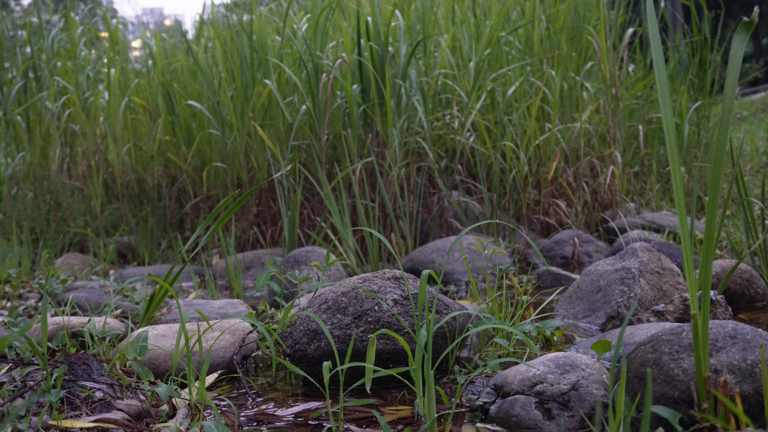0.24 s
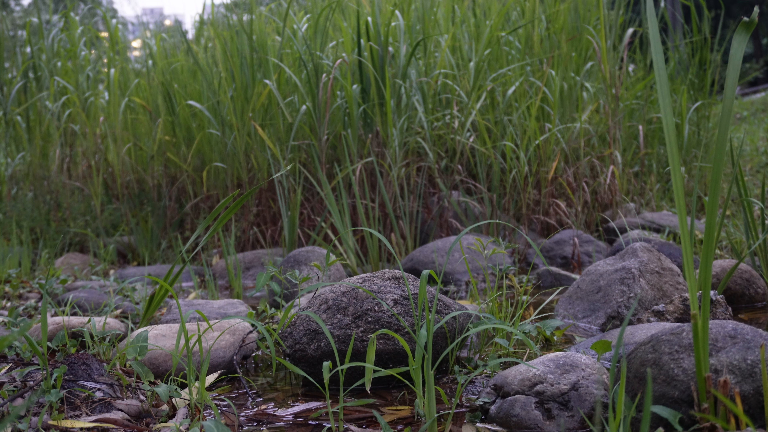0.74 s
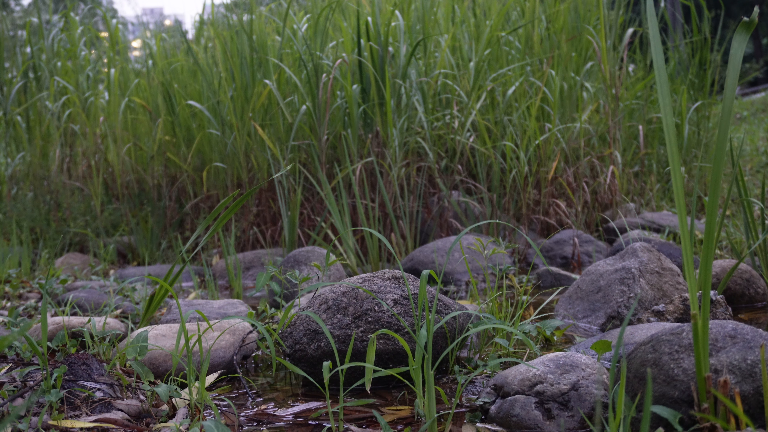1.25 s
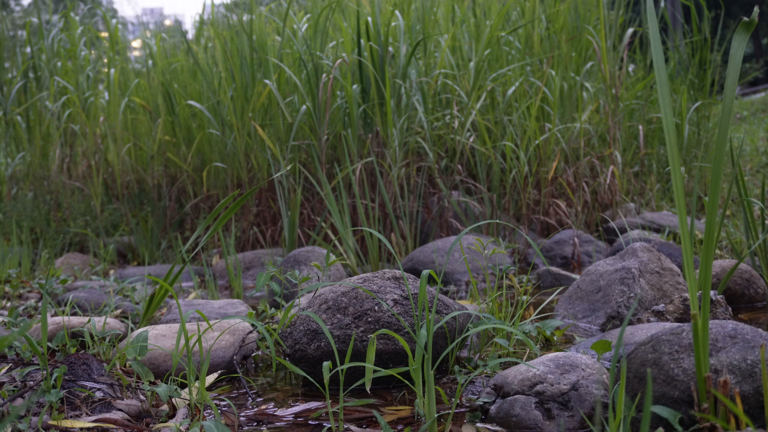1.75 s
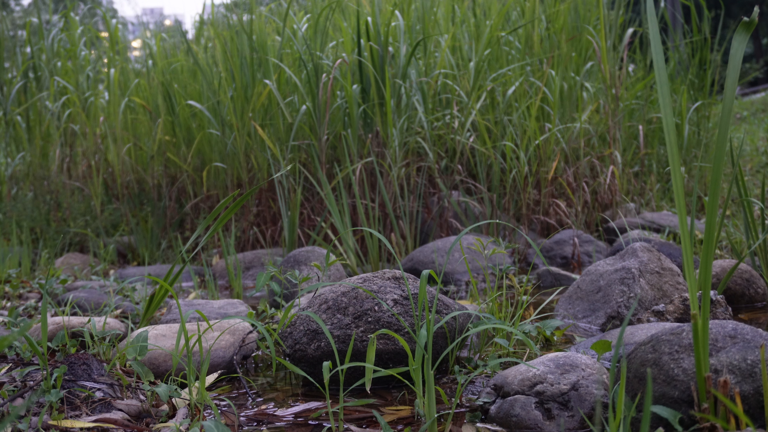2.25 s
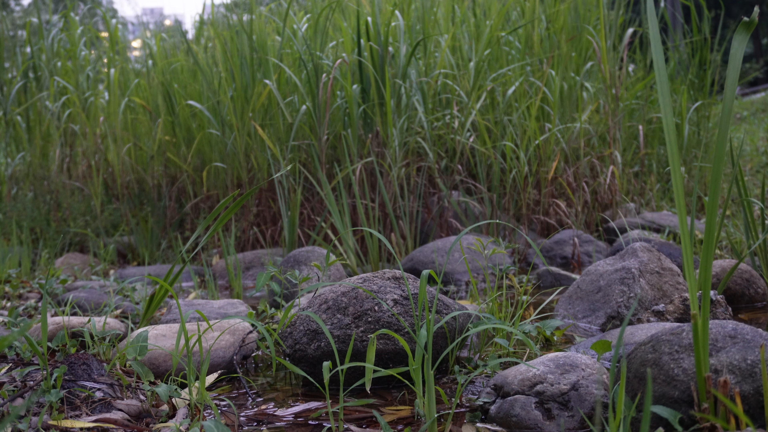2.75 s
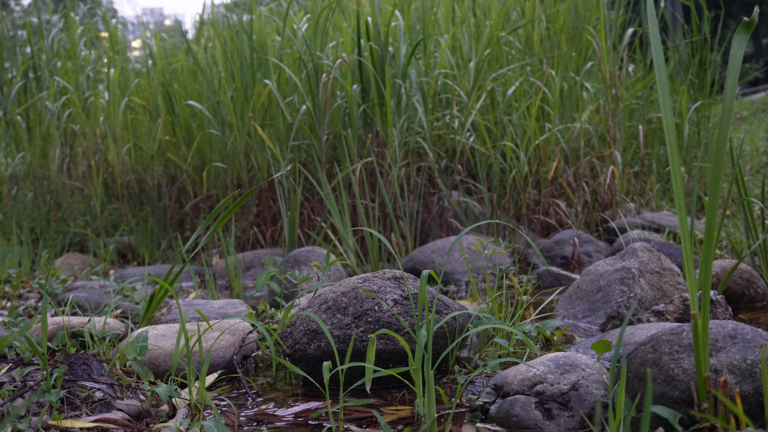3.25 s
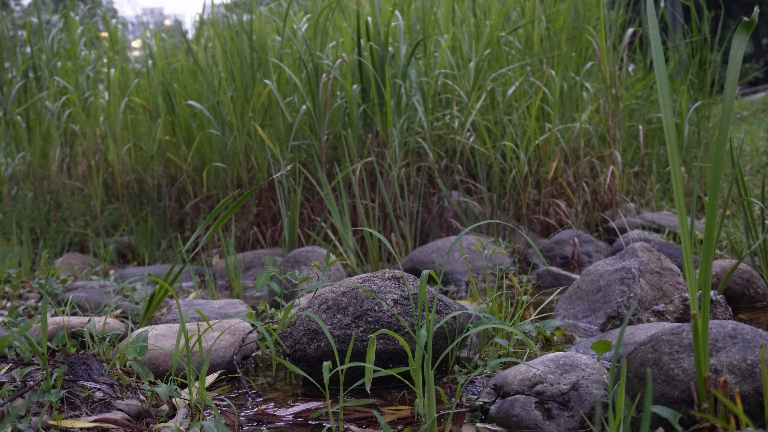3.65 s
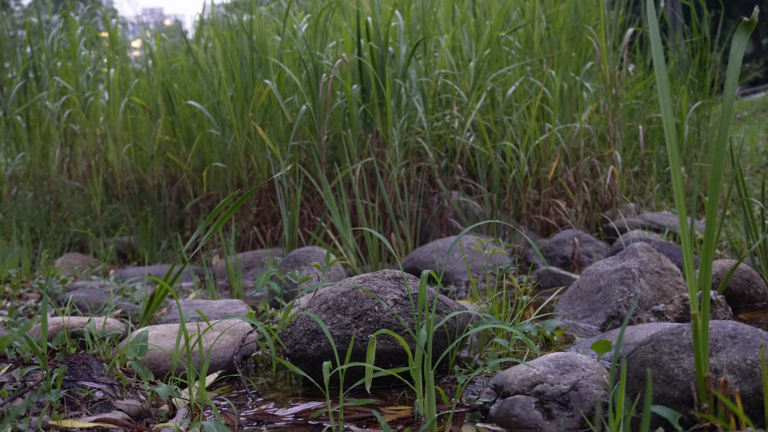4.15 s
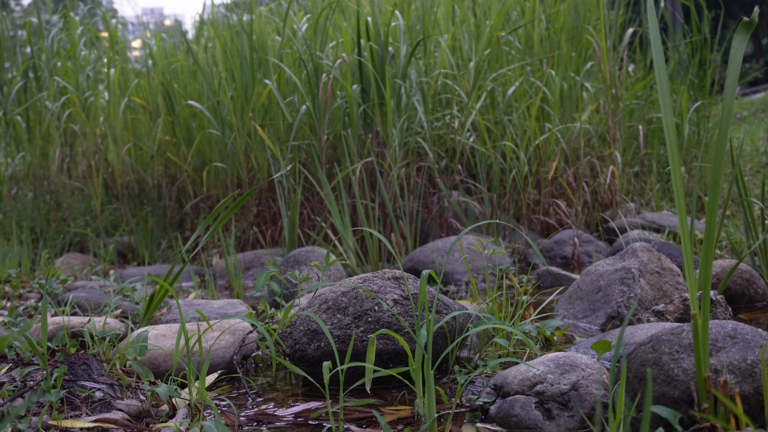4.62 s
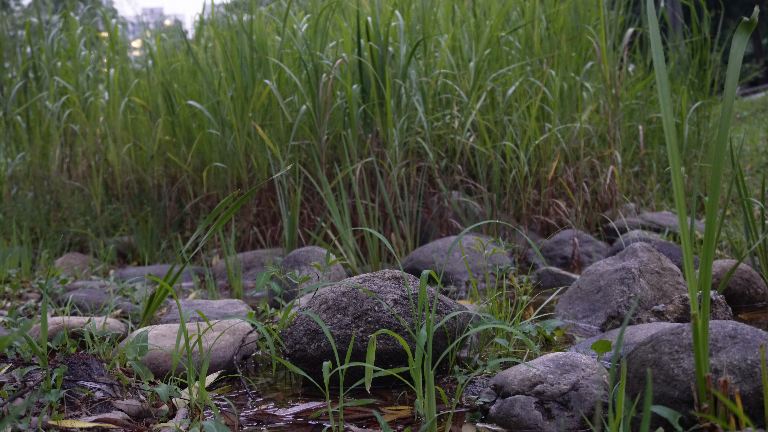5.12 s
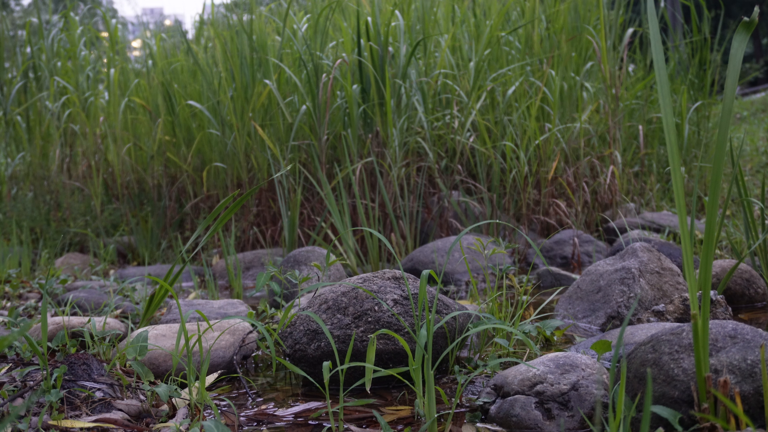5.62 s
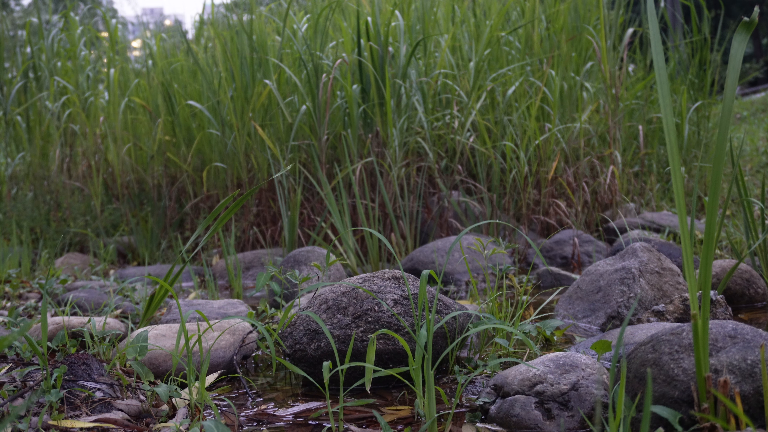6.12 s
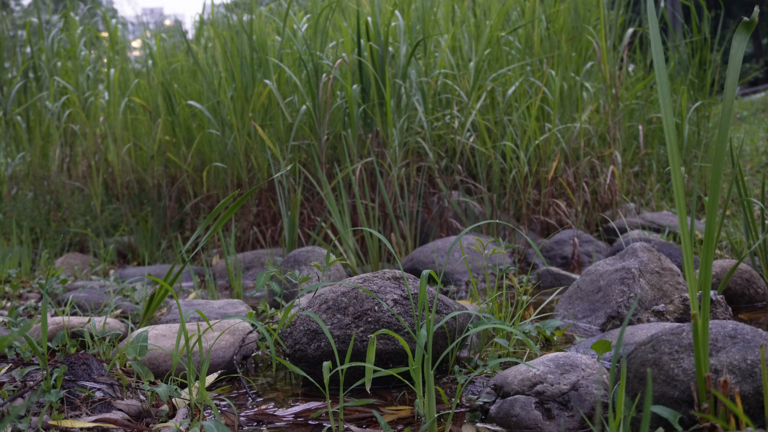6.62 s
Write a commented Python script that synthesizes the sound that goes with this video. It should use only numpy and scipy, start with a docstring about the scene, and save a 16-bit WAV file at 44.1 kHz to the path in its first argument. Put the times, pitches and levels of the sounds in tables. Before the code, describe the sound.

A thick, bright wall of far cicadas shrills continuously in trees around a stony, reedy park stream. Three nearer cicadas buzz through it with rapid, grainy rattles. Another sings about once a second: thin hiss, fluttering whine that swells and steadies, then a lower rasp cut short. Faint town rumble, a distant motor drone and a very soft wash of water lie beneath. Outdoor stereo, closely spaced microphones, steady position.

```python
"""A dense, glassy shrill of far cicadas fills the trees round a reedy park stream, flickering by band.
Three near cicadas buzz through it: volleys of rib snaps, each at its own beat, ring their bodies.
One more sings a phrase about every second: thin hiss, fluttering whine, then a low rasp that breaks off.
Its snaps drive resonances that follow the pitch of the abdomen. Filtered noise makes the far town
rumble, the drone of a motor and the soft wash of the stream."""
import sys
import numpy as np
from scipy import signal
from scipy.fft import rfft, irfft
from scipy.io import wavfile
from scipy.ndimage import uniform_filter1d

SR = 44100
rng = np.random.default_rng(int(sys.argv[2]) if len(sys.argv) > 2 else 0)


def transcribe(u):
    """Save the signal u as a 16-bit wav file named by the first command-line argument.

    u: samples, shape (n,) or (channels, n), limited to [-1, 1]; the rate is SR.
    q: integer samples, one column per channel.
    """
    v = np.clip(np.atleast_2d(u).T, -1, 1)
    q = np.round(v * 32767).astype(np.int16)
    wavfile.write(sys.argv[1], SR, q)


N = 302967
TIME = np.arange(N) / SR  # s
FREQ = np.maximum(np.fft.rfftfreq(N, 1 / SR), 1)  # Hz, kept above 0 for logs and division

# town rumble and stream wash, spectrum before trims: freq_hz, level_db (per Hz)
GROUND_SPECTRUM = [(20, -95), (42, -58.5), (70, -64.5), (140, -62), (260, -66), (400, -71.5), (600, -75),
                   (1150, -82), (1900, -83.5), (4000, -102.5)]
# far traffic, deep rumble; only the changes about the mean count: time_s, level_db
RUMBLE_LEVEL = [(0.05, -47), (0.07, -42), (0.37, -52), (2.36, -47), (2.79, -51), (5.9, -50), (6.71, -48),
                (6.8, -42)]
# far traffic, drone; only the changes about the mean count: time_s, level_db
DRONE_LEVEL = [(0.05, -36), (0.2, -37), (2.46, -40), (3.02, -38), (3.28, -40), (6.38, -40.5), (6.8, -40)]
# far motor, its pitch sinking overall while its level comes and goes: time_s, pitch_hz, level_db
MOTOR_COURSE = [(0, 220, -39.5), (1.2, 218, -47.5), (2, 186, -40), (3, 197, -52.5), (6.87, 187, -46)]
# far chorus, spectrum before trims: freq_hz, level_db (per Hz)
CHORUS_SPECTRUM = [(2400, -78.5), (2750, -68), (3150, -65.5), (3550, -58), (3950, -57.5), (4300, -50),
                   (4800, -55.5), (5250, -57), (5850, -50.5), (6200, -60), (7200, -56.5), (8500, -63.5),
                   (10200, -66.5), (12500, -74.5), (15300, -94)]
# far singers that stand out, before they waver and ease off:
# pitch_hz, half_width_hz, peak_db (per Hz), left_minus_right_db
FAR_SINGERS = [(4893, 11, -59, -6), (4940, 4.1, -43, -1), (5214, 16, -47.5, 3), (6010, 16, -51.5, 1),
               (6394, 21, -47.5, -4), (7060, 22, -65, 1), (7150, 50, -67, 1), (7766, 15, -67, -6)]
# body resonances of the three near buzzers, relative levels: freq_hz, half_width_hz, level_db
LOW_BUZZER_BODY = [(3685, 222, -0.5), (4890, 420, 3), (6470, 400, -2.5), (8300, 450, -7.5)]
BRIGHT_BUZZER_BODY = [(4380, 160, -6.5), (5676, 210, 4.5), (8140, 340, -17.5), (9520, 370, -9.5),
                      (10850, 270, -15.5)]
DOUBLE_BUZZER_BODY = [(3860, 92, -2), (6065, 530, 1), (9700, 670, -10.5)]
# abdomen partials of the whine, relative levels: pitch_multiple, width_hz, level_db
WHINE_PARTIALS = [(2, 260, 3.5), (5, 310, 8)]
# partials of the slack abdomen in the rasp, relative levels: pitch_multiple, width_hz, level_db
RASP_PARTIALS = [(1.58, 280, -24), (1.89, 149, -8.5), (2, 113, -3.5), (2.11, 158, -7), (2.52, 323, 1)]
# phrases, each lasting until the next; hiss peak before the hiss trim: start_s, hiss_peak_db
PHRASE_STARTS = [(-.52, -34), (.487, -32), (1.5, -33), (2.507, -33), (3.547, -33), (4.522, -34),
                 (5.509, -34), (6.498, -35)]

LAST_PHRASE_S = 1.0
# abdomen pitch: it tightens early in a phrase and slackens shortly before the end
TAUT_HZ, SLACK_HZ = 1464.5, 1394
TIGHTEN_S, SLACKEN_LEAD_S, SLACKEN_S = 0.22, 0.228, 0.16
# the whine sets in after a pause, swells, and gives way as the abdomen slackens
WHINE_START_DB, WHINE_DELAY_S, WHINE_ATTACK_S, SWELL_DB_PER_S, WHINE_SLACK_DB = -45, 0.14, 0.09, 6.5, -8
# the pumping of the abdomen holds, then dies away as the whine settles
FLUTTER_HZ, FLUTTER_HOLD_S, FLUTTER_FADE_S = 24.7, 0.2417, 0.35
# the rasp creeps in under the whine and jumps up with the slack
RASP_TAUT_DB, RASP_DELAY_S, RASP_ATTACK_S, RASP_SLACK_DB = -44, 0.43, 0.36, 14.5
BREAK_S = 0.034  # whine and rasp break off over this time
SCATTER, LIMP = 0.6, 0.2  # noise between snaps, inequality of the tymbals (shares of a snap)
HISS_DELAY_S = 0.078  # from the start of a phrase to the peak of its hiss
TOP_HZ = 15500


def undb(db):
    """Decibels to gain."""
    return 10 ** (np.asarray(db) / 20)


def unit(x):
    """Scale each channel to rms 1."""
    return x / np.sqrt(np.mean(x ** 2, axis=-1, keepdims=True))


def pan(db):
    """Left and right gains for a left-minus-right level difference."""
    return undb(np.array([[db], [-db]]) / 2)


def ease(x):
    """A smooth step from 0 to 1 as x goes from 0 to 1."""
    return np.sin(np.pi / 2 * np.clip(x, 0, 1)) ** 2


def follow(table, at):
    """The columns of a table after the first, joined by straight lines."""
    x, *columns = np.transpose(table)
    return [np.interp(at, x, column) for column in columns]


def walk(rate):
    """Random levels held 1 / rate s and smoothed twice; spread near 1."""
    hold = int(SR / rate)
    steps = np.repeat(rng.standard_normal(N // hold + 1), hold)
    return 1.3 * uniform_filter1d(uniform_filter1d(steps, hold), hold)[:N]


def shape(x, response):
    """Filter by a frequency response."""
    return irfft(rfft(x) * response, N)


def colour(points):
    """Response through (Hz, dB) points, straight on a log frequency axis."""
    hz, db = np.transpose(points)
    return undb(np.interp(np.log(FREQ), np.log(hz), db))


def resonance(hz, width):
    """A steep resonance, gain 1 at its centre; width in Hz between its half-amplitude points."""
    return (1 + 1j * (FREQ ** 2 - hz ** 2) / (FREQ * width)) ** -2


def glide(drive, pitch, partials):
    """Resonances that follow a pitch: turn the drive down to 0 Hz, smooth it, turn it back."""
    out = 0
    for multiple, width, db in partials:
        turn = np.exp(2j * np.pi * np.cumsum(multiple * pitch) / SR)
        lowpass = signal.butter(3, width / 2, fs=SR, output="sos")
        ring = signal.sosfilt(lowpass, drive / turn)
        out = out + undb(db) * unit((ring * turn).real)
    return out


def air_noise(likeness, response=1):
    """Stereo noise, 0 dB per Hz times a response, with the given correlation of left and right."""
    re, im = rng.standard_normal((2, 2, len(FREQ)))
    mid, side = (re + 1j * im) * np.sqrt(SR * N / 2) / 2
    c = np.clip(likeness, -1, 1)
    spectrum = mid * np.sqrt(1 + c) + side * np.sqrt(1 - c) * np.array([[1], [-1]])
    return irfft(spectrum * response, N)


def clicks(times, sizes):
    """Impulses, each shared between two neighbouring samples to land between them."""
    at = np.ravel(times) * SR
    keep = (at >= 0) & (at < N - 1)
    at, sizes = at[keep], np.ravel(sizes)[keep]
    i = at.astype(int)
    return np.bincount(i, sizes * (1 - at + i), N) + np.bincount(i + 1, sizes * (at - i), N)


def beats(hz, drift):
    """Times of the strokes of a muscle whose rate wanders a little."""
    phase = np.cumsum(hz * (1 + drift * walk(2))) / SR + rng.random()
    return np.interp(np.arange(1, phase[-1]), phase, TIME)


def foliage(x, scatter_s, wet_db, t60=1.0):
    """Reeds smear the sound differently for each ear; the trees add a short diffuse tail."""
    t = TIME[:SR // 2]
    near, far = rng.standard_normal((2, 2, len(t)))
    near = unit(signal.fftconvolve(x[None], near * np.exp(-t / scatter_s), axes=1)[:, :N])
    far = unit(signal.fftconvolve(x[None], far * undb(-60 * t / t60), axes=1)[:, :N])
    return unit(near + undb(wet_db) * far)


def ripple(depth_db, spacing_hz):
    """Echoes from stones and trunks give each ear its own fine, fixed, uneven response."""
    grid = np.arange(0, SR / 2, spacing_hz)
    rows = rng.standard_normal((2, 2048))
    gains = [undb(depth_db * np.interp(FREQ, grid, row[:len(grid)])) for row in rows]
    return unit(np.array(gains))


def close_pair(x, alike_hz=3500, apart_hz=5700, narrow=0.16):
    """Two microphones close together hear the longer waves almost alike."""
    mid = x.mean(axis=0)
    width = np.interp(FREQ, [alike_hz, apart_hz], [narrow, 1])
    return shape(mid + shape(x - mid, width), 1 / np.hypot(1, width))


def ground(db=-0.5, motor_width=36, singers_db=-80):
    """Far traffic with a droning motor, the even wash of the stream, and the low partial of far singers."""
    levels = follow(RUMBLE_LEVEL, TIME) + follow(DRONE_LEVEL, TIME)
    rumble_db, drone_db = (level - np.mean(level) for level in levels)
    likeness = np.interp(FREQ, [30, 90, 180, 350, 1500], [.999995, .99997, .9987, .979, .974])
    bed = air_noise(likeness, colour(GROUND_SPECTRUM))
    # three crossfaded bands: deep rumble, drone, stream wash
    deep = np.interp(FREQ, [60, 100], [1, 0])
    wash = np.interp(FREQ, [300, 900], [0, 1])
    rumble = shape(bed, deep) * undb(rumble_db)
    drone = shape(bed, 1 - deep - wash) * undb(drone_db)
    motor_hz, motor_db = follow(MOTOR_COURSE, TIME)
    motor = glide(rng.standard_normal(N), motor_hz, [(1, motor_width, 0)]) * undb(motor_db)
    singers = air_noise(1.0, resonance(1484, 216)) * undb(singers_db)
    return undb(db) * (rumble + drone) + motor + shape(bed, wash) + singers


def chorus(db=-1.0, fade_db_per_s=0.18, flicker_db=0.32, shrill_db=0, pan_db=1.3):
    """Far cicadas blur into noise whose bands swell on their own; a few tones stand out; all ease off."""
    likeness = np.interp(FREQ, [2420, 3100, 4500, 7060, 12000], [1.0, 0.45, 0.52, 0.21, -0.27])
    low_edge = 1 / np.sqrt(1 + (2380 / FREQ) ** 24)  # small bodies radiate almost nothing lower
    response = colour(CHORUS_SPECTRUM) * low_edge * ripple(depth_db=1.8, spacing_hz=39.76)
    crowd = rfft(air_noise(likeness, response))
    centres = np.geomspace(2500, 15000, num=8)
    bands = [np.interp(FREQ, centres, share) for share in np.eye(len(centres))]
    out = sum(irfft(crowd * band, N) * undb(db + flicker_db * walk(13)) for band in bands) * pan(pan_db)
    for hz, half_width, peak_db, side_db in FAR_SINGERS:
        tone = air_noise(0.18, resonance(hz, 2 * half_width))
        out = out + tone * pan(side_db) * undb(shrill_db + peak_db + walk(1.8))
    return out * undb(-fade_db_per_s * TIME)


def buzzer(body, hz, ribs, db, pan_db, wet_db, jitter_s=0.000146, scatter_db=1.0):
    """Each muscle stroke buckles the tymbal ribs in turn (shares of the cycle); each snap rings the body."""
    times = beats(hz, 0.004)[:, None] + np.array(ribs) / hz
    slip, size = rng.standard_normal((2, *times.shape))
    snaps = clicks(times + jitter_s * slip, undb(scatter_db * size))
    ring = sum(undb(level_db) * resonance(f, 2 * half_width) for f, half_width, level_db in body)
    heard = close_pair(foliage(snaps, 0.0011, wet_db))
    return unit(shape(heard, ring)) * undb(db) * pan(pan_db)


def phrase_clock():
    """Seconds since the current phrase began, and seconds until it ends."""
    starts = np.array(PHRASE_STARTS)[:, 0]
    ends = np.append(starts[1:], starts[-1] + LAST_PHRASE_S)
    current = np.searchsorted(starts[1:], TIME)
    return TIME - starts[current], ends[current] - TIME


def hiss(snaps, db=-5, rise_s=0.042, fall_s=0.049, snap_db=-5):
    """As the abdomen tightens again, only the thin top of the snaps sounds, smeared by leaves."""
    t = TIME - HISS_DELAY_S
    swell = 0
    for start, peak_db in PHRASE_STARTS:
        spread = np.where(t < start, rise_s, fall_s)
        swell = swell + undb(peak_db) * np.exp(-((t - start) / spread) ** 2 / 2)
    sizzle = unit(air_noise(-0.2)) + undb(snap_db) * foliage(snaps, 0.0015, -5)
    top = colour([(7000, -37), (10500, -2), (12000, -2), (14000, -3), (15500, -14)])
    return unit(shape(sizzle, top * (FREQ > 5000))) * swell * undb(db)


def undertone(tension, age, db=-54.5, stretch=1.35, waver=0.01182, restart_db=-7, grow_s=1.0):
    """The lowest abdomen mode radiates faintly, grows through a phrase, bends further than the upper ones."""
    hz = SLACK_HZ + stretch * (TAUT_HZ - SLACK_HZ) * tension
    phase = 2 * np.pi * np.cumsum(hz * (1 + waver * tension * walk(130))) / SR
    effort_db = restart_db * uniform_filter1d(1 - ease(age / grow_s), SR // 50)
    return unit(np.sin(phase) * undb(1.8 * walk(70))) * undb(db + effort_db)


def phrase_singer(snap_hz=184.3, pan_db=2):
    """Fast tymbal snaps ring an abdomen that pumps, holds, and then slackens into a rasp."""
    age, left = phrase_clock()
    slack = ease((SLACKEN_LEAD_S - left) / SLACKEN_S)
    tension = ease(age / TIGHTEN_S) * (1 - slack)
    pitch = SLACK_HZ + (TAUT_HZ - SLACK_HZ) * tension
    # the snap rate hardly changes, so the sinking resonances pass from one of its lines to the next
    times = beats(snap_hz, 0.004)
    slip, size = rng.standard_normal((2, len(times)))
    # the two tymbals snap in turn, and grow unequal as the abdomen slackens
    uneven = 1 + LIMP * np.interp(times, TIME, slack) * (-1) ** np.arange(len(times))
    snaps = unit(clicks(times + 0.00003 * slip, uneven * undb(2 * size)))
    drive = snaps + SCATTER * unit(air_noise(0.74))  # scatter off the leaves fills the gaps between snaps
    settling = age - FLUTTER_HOLD_S
    flutter_depth = 1 - ease(settling / FLUTTER_FADE_S)
    pumping = 1 + flutter_depth * np.cos(2 * np.pi * FLUTTER_HZ * settling)
    sung = age - WHINE_DELAY_S
    whine_db = WHINE_START_DB + SWELL_DB_PER_S * sung + WHINE_SLACK_DB * slack ** 2
    whine_gain = ease(sung / WHINE_ATTACK_S) * undb(whine_db)
    rasp_gain = ease((age - RASP_DELAY_S) / RASP_ATTACK_S) * undb(RASP_TAUT_DB + RASP_SLACK_DB * slack)
    whine = glide(drive, pitch, WHINE_PARTIALS) * pumping * whine_gain
    rasp = glide(drive, pitch, RASP_PARTIALS) * rasp_gain
    voice = (whine + rasp) * ease(left / BREAK_S) * pan(pan_db)
    return voice + hiss(snaps) + undertone(tension, age)


def scene():
    """Ground, far chorus, three near buzzers and the phrase singer."""
    background = ground() + chorus()
    low = buzzer(LOW_BUZZER_BODY, hz=33.2, ribs=[0, .15, .25, .35, .52], db=-26.8, pan_db=2.5, wet_db=-11)
    bright = buzzer(BRIGHT_BUZZER_BODY, hz=34.7, ribs=[0, .1, .28, .36, .5], db=-28.8, pan_db=2, wet_db=-6)
    double = buzzer(DOUBLE_BUZZER_BODY, hz=37.8, ribs=[0, .08, .34, .41], db=-27.6, pan_db=-4.5, wet_db=-9)
    return background + low + bright + double + phrase_singer()


def record(dry):
    """A steep low-pass cuts the top above TOP_HZ."""
    return signal.sosfilt(signal.ellip(10, 0.2, 80, TOP_HZ, fs=SR, output="sos"), dry)


dry = scene()
out = record(dry)
transcribe(out)
```